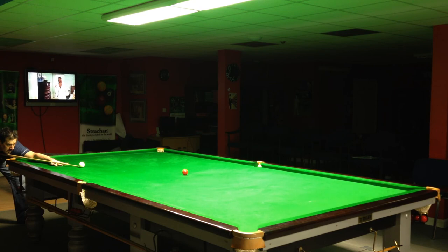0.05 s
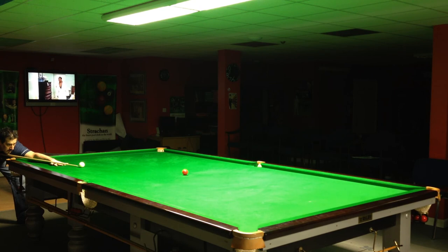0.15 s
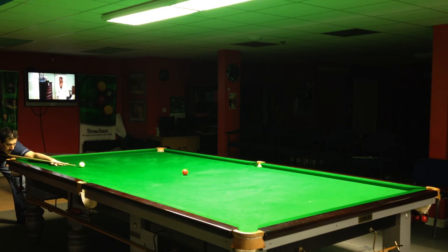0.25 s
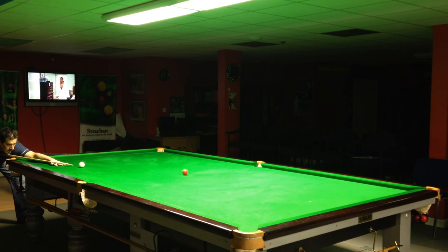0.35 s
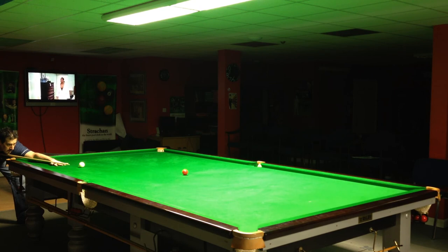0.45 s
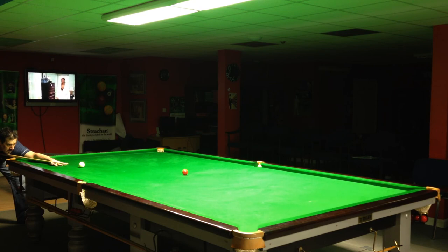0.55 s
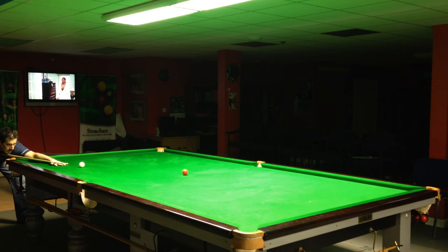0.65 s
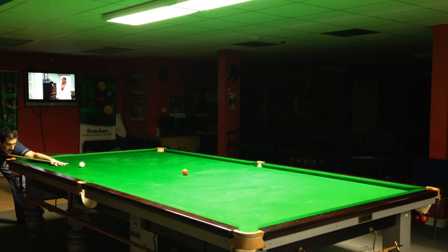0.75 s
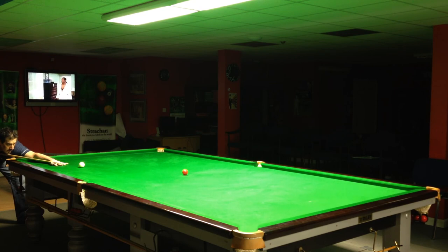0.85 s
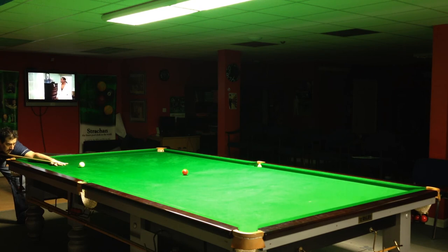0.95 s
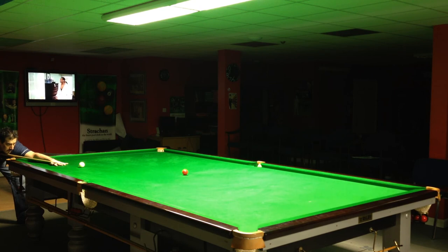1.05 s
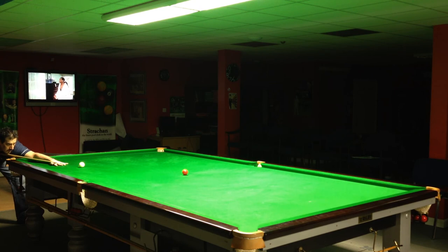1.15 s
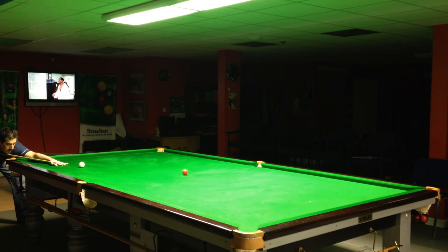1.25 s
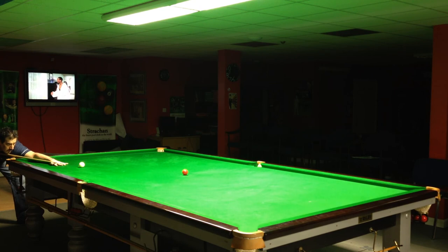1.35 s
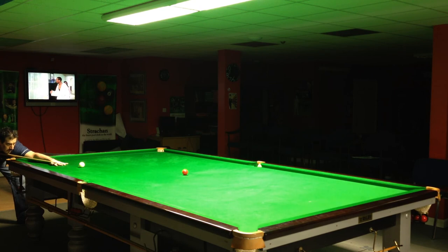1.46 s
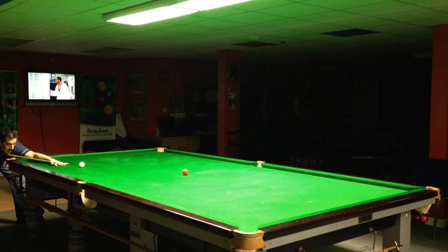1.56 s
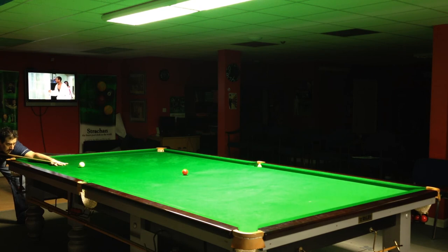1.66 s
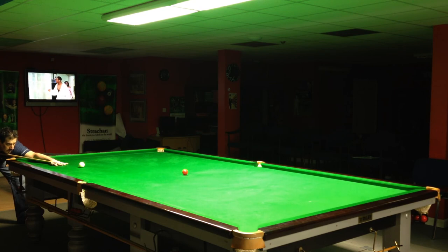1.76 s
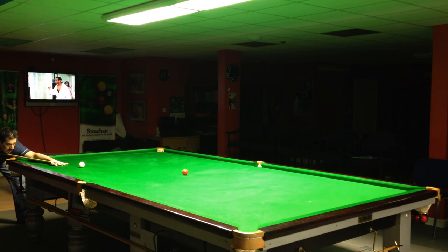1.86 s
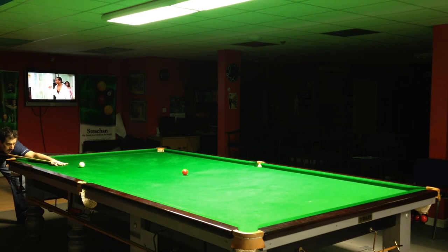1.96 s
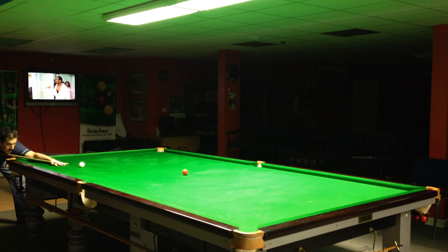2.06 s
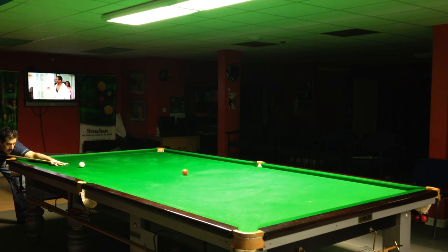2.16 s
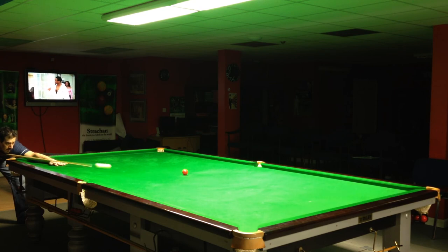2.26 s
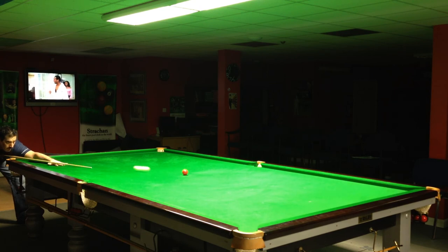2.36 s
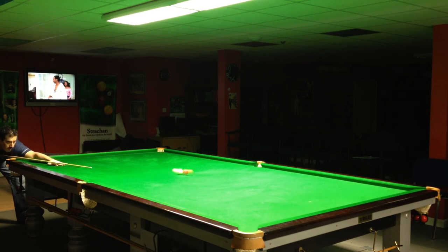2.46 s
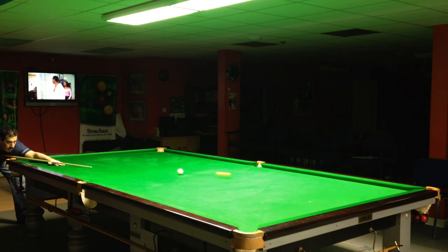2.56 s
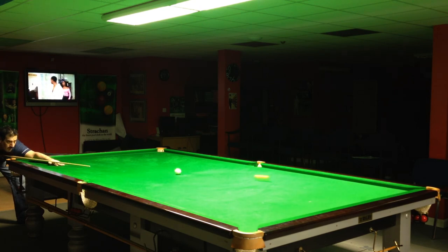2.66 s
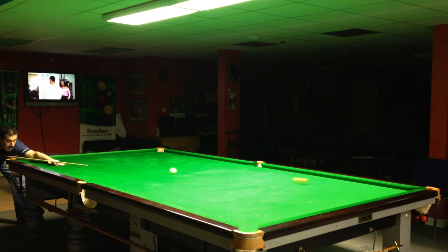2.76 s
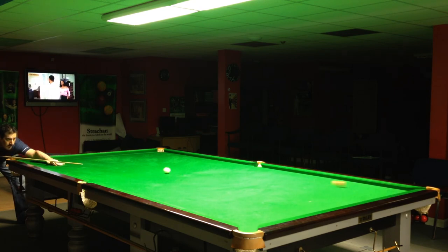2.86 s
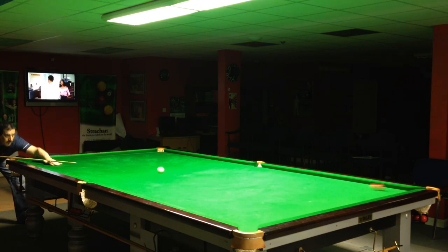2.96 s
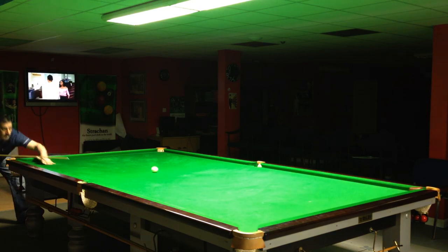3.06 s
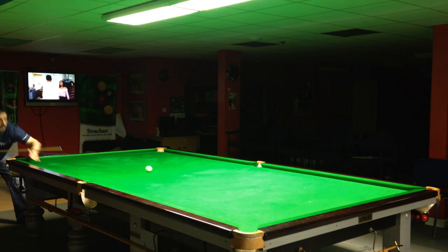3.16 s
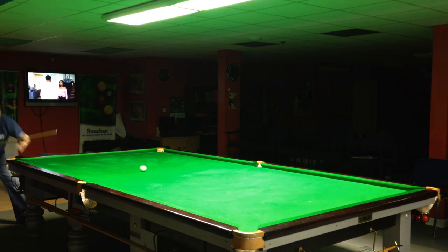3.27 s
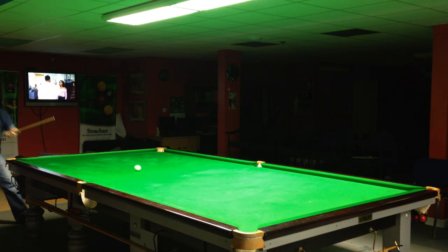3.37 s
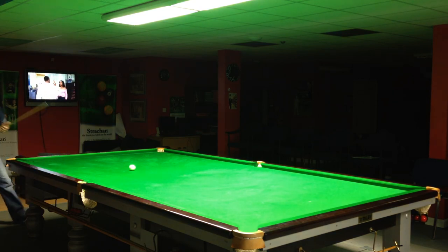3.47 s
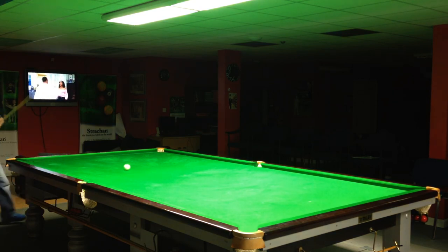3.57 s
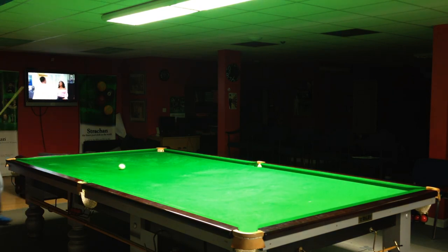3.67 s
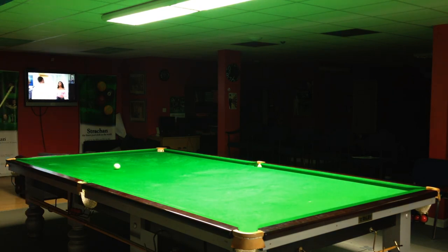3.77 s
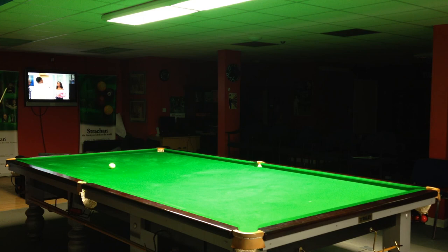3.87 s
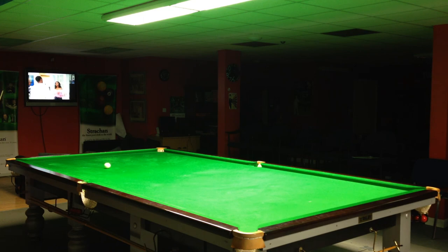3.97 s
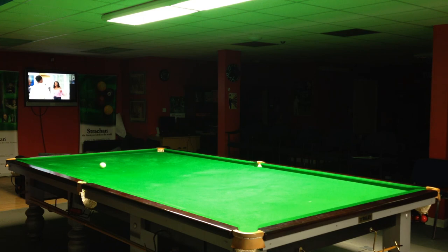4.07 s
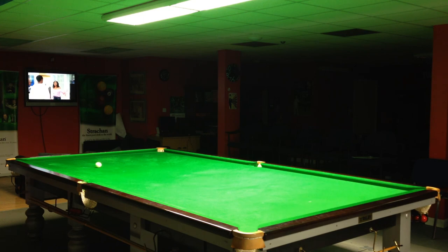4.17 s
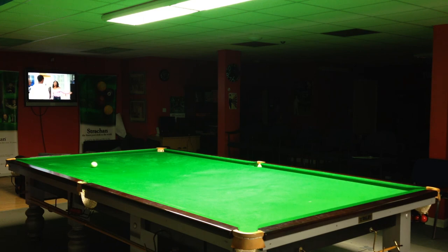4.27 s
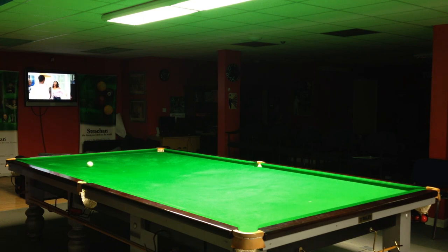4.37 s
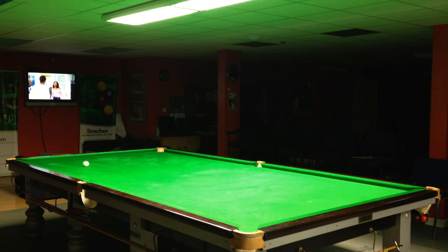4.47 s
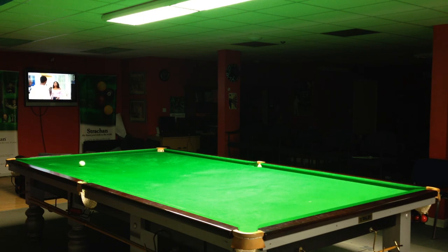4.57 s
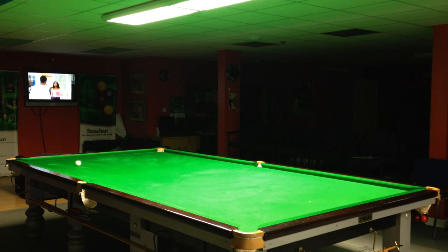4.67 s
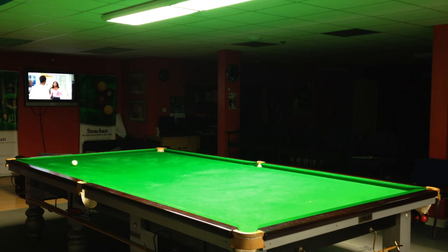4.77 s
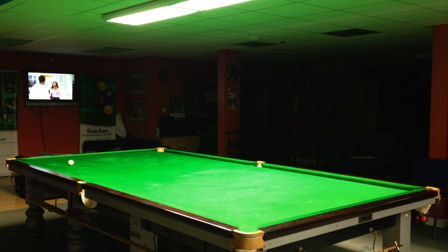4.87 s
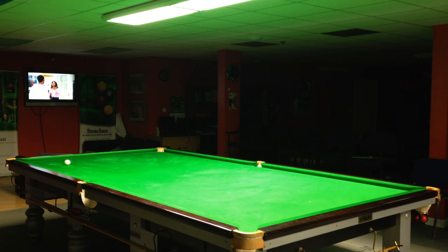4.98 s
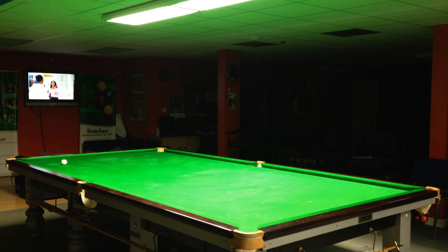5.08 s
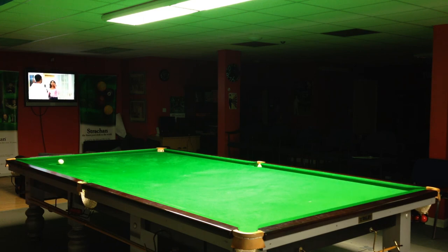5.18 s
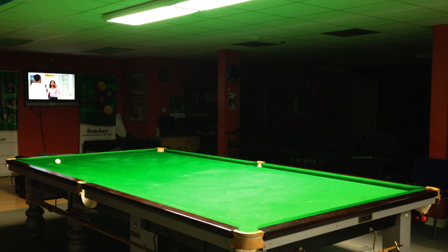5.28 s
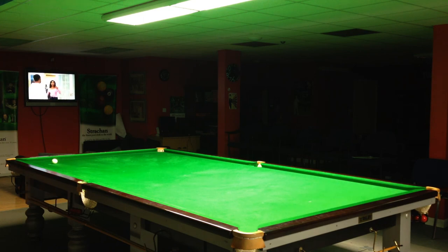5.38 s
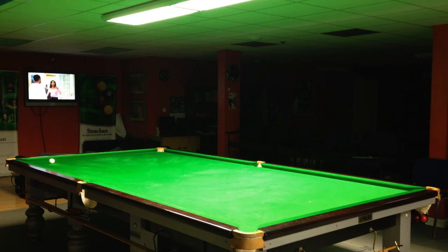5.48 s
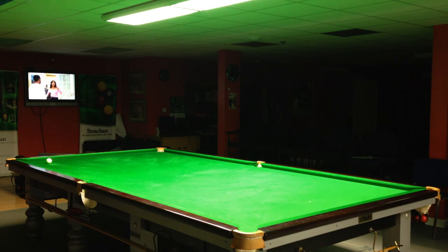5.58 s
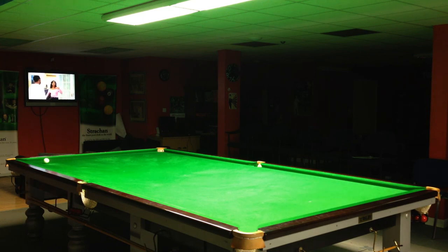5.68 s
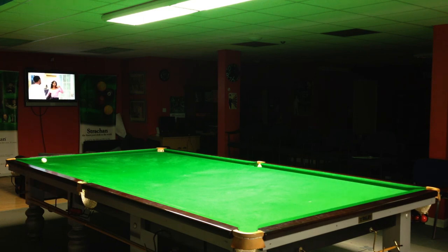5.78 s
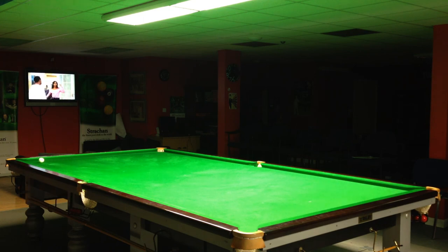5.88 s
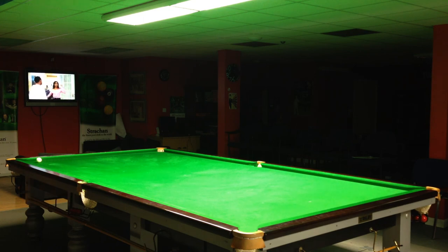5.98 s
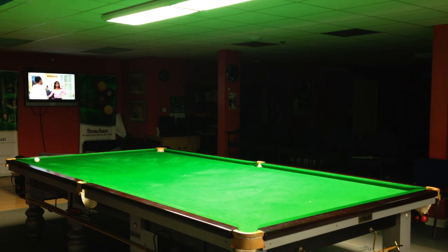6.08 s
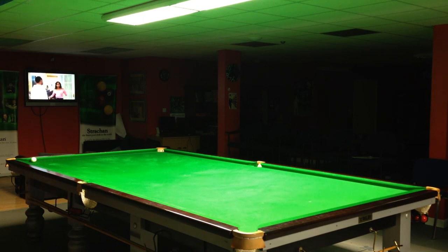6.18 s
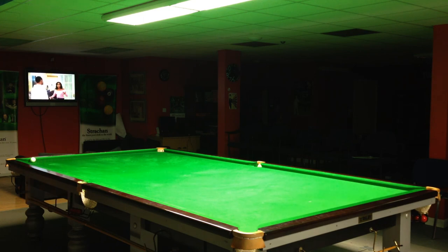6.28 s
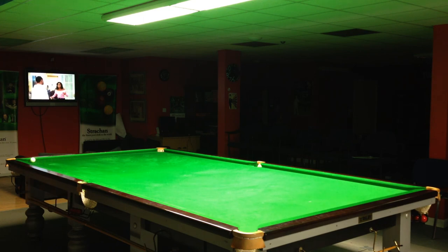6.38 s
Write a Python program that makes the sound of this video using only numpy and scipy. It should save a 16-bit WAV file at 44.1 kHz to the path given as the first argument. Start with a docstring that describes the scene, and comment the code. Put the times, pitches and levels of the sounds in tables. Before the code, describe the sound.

In a quiet, humming room a cue cracks on a snooker ball, balls click sharply, then one thuds into a pocket before soft footsteps.

```python
"""A quiet, low-ceilinged club room, where one snooker shot is played over steady hum, rumble and hiss.
The cue cracks on the white: its shaft rings and its chalked tip rasps. The balls rumble as shaped noise.
The white clicks on a colour, a short pulse with echoes from table and walls. The colour thuds into a pocket,
made of hollow swings and frame rings, and clicks against a ball in the rail below.
The player then steps away with dull noise swells and a faint rustle."""
import sys
import numpy as np
from scipy import signal
from scipy.fft import rfft, irfft
from scipy.io import wavfile

SR = 44100
rng = np.random.default_rng(int(sys.argv[2]) if len(sys.argv) > 2 else 0)


def store_wav(level_fs):
    """Save 16-bit WAV to argv[1]."""
    pcm = np.round(np.clip(np.atleast_2d(level_fs), -1, 1) * 32767)
    wavfile.write(sys.argv[1], SR, pcm.T.astype(np.int16))


N = 284224  # length of the scene [samples]


def amp(db):
    """Turns decibels into a plain gain."""
    return 10 ** (np.asarray(db) / 20)


def unit(x):
    """Scales to an rms of one."""
    return x / np.sqrt(np.mean(x ** 2) + 1e-20)


def read(points, hz):
    """Joins (Hz, value) points by straight lines on a log-frequency axis."""
    f, value = np.transpose(points)
    return np.interp(np.log(hz + 1), np.log(f + 1), value)


def add(mix, s, sound):
    """Mixes a sound in at time s; what runs past the end is cut off."""
    part = mix[round(s * SR):][:len(sound)]
    part += sound[:len(part)]


def noise(spectrum):
    """Steady noise with this spectrum and an rms of one."""
    white = rfft(rng.standard_normal(N))
    gain = amp(read(spectrum, np.fft.rfftfreq(N, 1 / SR)))
    return unit(irfft(white * gain, N))


# ventilation rumble and hiss: (frequency [Hz], relative level [dB])
AIR_SPECTRUM = [(12, -48), (25, -25.5), (36, -14), (50, -5), (100, -2), (160, -5.5), (270, -11.5),
                (500, -17.5), (900, -23.5), (1600, -27.5), (3600, -22.5), (6000, -24.5), (10000, -26),
                (15000, -26)]
# mains and fan tones: (frequency [Hz], rms level [dB])
HUM_TONES = [(48.4, -77), (102, -78), (242.3, -72.5), (398.5, -84.5)]
AIR_DB = -64.5


def background(waver=0.27):
    """Moving air makes a broad noise; mains and fan add tones whose phase wavers (waver in radians rms)."""
    t = np.arange(N) / SR
    out = amp(AIR_DB) * noise(AIR_SPECTRUM)
    for hz, db in HUM_TONES:
        drift = noise([(0, 0), (2, 0), (8, -20), (40, -120)])  # mostly slower than a few Hz
        out += amp(db) * np.sqrt(2) * np.sin(2 * np.pi * hz * t + waver * drift)
    return out


def soften(x, hz):
    """Low-pass of a contact that lasts about one cycle of hz."""
    low_pass = signal.butter(2, min(hz, SR / 3), fs=SR, output="sos")
    return signal.sosfilt(low_pass, x)


def ring(modes, contact_hz):
    """Modes of a struck body die away; a soft, long contact leaves out the treble."""
    t = np.arange(SR // 2) / SR
    body = np.zeros(len(t))
    for k, (hz, db, t60) in enumerate(modes):
        damping = np.log(1000) / t60
        swing = np.exp(-damping * t) * np.cos(2 * np.pi * hz * t)
        # neighbouring modes swing in opposite directions at the far end of the body
        body += (-1) ** k * amp(db) * 2 * damping / SR * swing
    return soften(body, contact_hz)


TAPS = 8192  # frequency grid of a pulse


def pulse(spectrum, pitch=1):
    """The shortest causal click with this spectrum, transposed by pitch."""
    hz = abs(np.fft.fftfreq(TAPS, 1 / SR))
    log_gain = np.log(amp(read(spectrum, hz / pitch)))
    # the Hilbert transform gives the phase that brings the energy in earliest
    minimum_phase = np.exp(np.conj(signal.hilbert(log_gain)))
    return np.fft.ifft(minimum_phase).real[:TAPS // 2]


def scatter(t60, size=SR):
    """A dying spray of reflections of uneven strength, with energy one."""
    taps = np.zeros(size)
    at = np.arange(0, size - 20, 20)  # one reflection somewhere in every 20 samples
    strength = amp(3.5 * np.minimum(rng.exponential(1, len(at)), 3))
    taps[at + rng.integers(0, 20, len(at))] = rng.choice([-1., 1.], len(at)) * strength
    taps *= amp(-60 * np.arange(size) / SR / t60)
    return taps / np.linalg.norm(taps)


# how long the room rings: (frequency [Hz], time to fall by 60 dB [s])
ROOM_DECAY = [(100, 0.79), (300, .55), (700, 0.25), (1300, 0.3), (2300, 0.41), (4000, .38), (8000, 0.12),
              (15000, 0.2793)]


def room(x, build_s=0.014):
    """The diffuse tail: reflections build up, then each band dies at its own speed."""
    hz, t, bands = signal.stft(scatter(np.inf), SR, nperseg=256)
    fade = amp(-60 * t / read(ROOM_DECAY, hz)[:, None])
    tail = signal.istft(bands * fade, SR, nperseg=256)[1][:SR]
    tail *= 1 - np.exp(-(np.arange(SR) / SR / build_s) ** 2)
    return signal.fftconvolve(x, tail / np.linalg.norm(tail))


# tip on ball and then shaft on table:
# (time [s], level [dB], contact cut-off [Hz], room level [dB])
CUE_HITS = [(2.3353, 6.5, 1096, -15.5), (2.3399, 6.5, 3494, -8.5), (2.4824, -9, 1500, -10)]
# ring of the wooden cue: (frequency [Hz], level [dB], time to fall by 60 dB [s])
CUE_RING = [(170, -2, .05), (275, 0, .1), (550, 2, .04), (660, 6, .03), (841, 2, .06), (1012, 0, .05),
            (1250, 2, .03), (1475, 4, .045), (1694, 3, .1), (2304, -3, .07), (2930, -6, .09),
            (4113, 2, .05), (4420, 0, .07)]
# dead knock of the cue: (frequency [Hz], level [dB])
CUE_DEAD_KNOCK = [(60, -30.5), (160, -9.5), (400, -2.5), (700, 1), (1500, 7.5), (2200, -24.5), (5000, -22),
                  (12000, -35.5)]
# the chalked tip gripping the ball: (frequency [Hz], level [dB])
CHALK_RASP = [(800, -22), (1800, -1.5), (2800, -2.5), (3400, -6), (4300, -4.5), (5500, -6.5), (6800, -10.5),
              (7700, -16.5), (8800, -15.5), (10500, -24), (15000, -37)]
CUE_RING_DB, CUE_KNOCK_DB, CUE_NEAR_DB = 3.5, -2, -7  # shaft ring, dead knock, scatter off the table
CHALK_S, CHALK_DB, CHALK_ROOM_DB = 2.3376, 5.5, 4  # the tip leaves the ball


def cue():
    """The shaft rings under each blow, and the chalked tip rasps as it leaves the ball."""
    out = np.zeros(N)
    for s, db, contact_hz, room_db in CUE_HITS:
        blow = amp(db + CUE_RING_DB) * ring(CUE_RING, contact_hz)
        knock = soften(pulse(CUE_DEAD_KNOCK), contact_hz)
        add(blow, 0, amp(db + CUE_KNOCK_DB) * knock)
        add(out, s, blow)
        add(out, s, amp(room_db) * room(blow))
        near = scatter(t60=.08)
        add(out, s, amp(CUE_NEAR_DB) * signal.fftconvolve(blow, near))
    grip = pulse(CHALK_RASP)
    rasp = signal.fftconvolve(grip, scatter(t60=.1))
    add(out, CHALK_S, amp(CHALK_DB) * rasp)
    # the player's body and the cloth shade the top of the rasp from the room
    shaded = soften(grip, hz=4270)
    add(out, CHALK_S, amp(CHALK_ROOM_DB) * room(shaded, build_s=0.017))
    return out


# rumble of a rolling ball: (frequency [Hz], relative level [dB])
ROLL_SPECTRUM = [(35, -18), (80, -5.5), (160, 8), (330, 2.5), (450, -12.5), (650, -20.5), (1500, -36.5),
                 (4000, -67.5)]
# the white to the colour, the colour to the pocket, the colour down the rail:
# (start time [s], length [s], starting level [dB], fading [dB per s])
ROLL_RUNS = [(2.34, 0.35, -68, 21), (2.59, 0.39, -50.5, 33), (3.247, 0.13, -49, 12)]
ROLL_ATTACK_S, ROLL_RELEASE_DB_PER_S = 0.0391, 95  # the table takes up the rumble, and rings on at the stop


def rolling():
    """A running ball rumbles on slate or rail, most while it still skids, and ever less as it settles."""
    rumble, out = noise(ROLL_SPECTRUM), np.zeros(N)
    for start, length, db, fade_db_per_s in ROLL_RUNS:
        age = np.maximum(np.arange(N) / SR - start, 0)
        fall_db = fade_db_per_s * np.minimum(age, length)
        fall_db += ROLL_RELEASE_DB_PER_S * np.maximum(age - length, 0)
        attack = np.minimum(age / ROLL_ATTACK_S, 1)
        out += attack * amp(db - fall_db) * rumble
    return out


# ball on ball, or on the wire of the rail: (time [s], level [dB], pitch factor from the hardness
# of the hit, wall echo level [dB], near scatter level [dB], room level [dB])
BALL_CLICKS = [(2.588, 22.5, 0.92, -1, -15.5, -6.5), (3.379, -32, 0.67, -10, 5, 9),
               (3.4426, 4, .7, -20, -10, -18), (3.4439, 11, .75, -7, -8, -13),
               (3.447, 5, 0.91, -2.5, 2.5, -27)]
# the click straight from the balls: (frequency [Hz], level [dB])
DIRECT_SPECTRUM = [(100, -49), (600, -31.5), (1100, -29), (1800, -25), (2500, -13), (3100, 0.5), (4000, -6),
                   (4800, -16), (6000, -49), (9000, -60), (11500, -40), (15000, -47.5)]
# the duller click that they throw sideways into the room: (frequency [Hz], level [dB])
SPREAD_SPECTRUM = [(100, -29.5), (400, -25), (700, -24), (900, -13), (1300, -8.5), (1650, -8), (2150, -1),
                   (2650, -4.5), (3200, -8), (4100, -13), (4900, -22), (5900, -34.5), (14000, -42.5)]
# echoes from slate, cushions, ceiling and walls: (delay time [s], level [dB], pitch factor)
CLICK_ECHOES = [(.0016, -10, 0.923), (.0038, -5, 0.8482), (.0135, -18, 0.75), (.0208, -21, 0.7),
                (0.0277, -9, .88), (.0325, -17, 0.33), (.0362, -13.5, .85), (.0485, -27, 1),
                (.0635, -16, 0.633)]


def clicks():
    """Hard balls touch for a fraction of a millisecond; all that follows is table and room."""
    out = np.zeros(N)
    for s, db, pitch, echo_db, near_db, room_db in BALL_CLICKS:
        add(out, s, amp(db) * pulse(DIRECT_SPECTRUM, pitch))
        for delay, loss_db, dulling in CLICK_ECHOES:
            echo = soften(pulse(DIRECT_SPECTRUM, pitch * dulling), hz=5500)
            add(out, s + delay, amp(db + echo_db + loss_db) * echo)
        spread = amp(db) * pulse(SPREAD_SPECTRUM, pitch ** .3)
        near = signal.fftconvolve(spread, scatter(t60=0.12))
        add(out, s, amp(near_db) * near)
        add(out, s, amp(room_db) * room(spread, build_s=0.013))
    return out


def bump(hz):
    """A padded blow: a hollow swing that swells and dies within a few cycles; gain about one at hz."""
    turns = np.arange(SR // 2) / SR * hz
    swell = turns ** 2 * np.exp(-turns / .6)
    return 2 * swell / swell.sum() * np.sin(2 * np.pi * turns)


# a ball hops on the slate, then knocks on the jaws and tumbles into the pocket:
# (time [s], level [dB], pitch of the padding [Hz], slap level [dB], frame ring level [dB], room level [dB])
POCKET_THUDS = [(2.6170, 1, 115.1, -15.5, -16.5, -8), (2.7330, 6.5, 181, -32, -6.5, -17),
                (3.1918, 15.5, 500, -18.5, -6, -5.5), (3.207, 17, 276, -40.5, -5, -4.5),
                (3.214, 17, 78, -67, -12, -8.5), (3.2286, 15.5, 470, -27.5, -8, -29),
                (3.239, 20.5, 343, -44, -0.5, -12), (3.259, 12, 313, -33, -2, -13),
                (3.2830, 13.5, 345, -44, -14, -21), (3.466, 6, 135.5, -24.5, -20.5, -4)]
# slap on rubber or leather: (frequency [Hz], level [dB])
SLAP_SPECTRUM = [(100, -24.5), (500, 3.5), (750, -2.5), (1150, -0.5), (1450, -16), (2000, -26),
                 (4000, -38.5), (9000, -63.5)]
# ring of the pocket and table frame: (frequency [Hz], level [dB], time to fall by 60 dB [s])
FRAME_RING = [(130, -5, .1), (194, -3, .12), (316, 5, .24), (382, 7, .24), (474, -5, .14), (524, -4, .14),
              (760, -20, .06)]


def pocket():
    """Cloth, rubber and leather bump and slap, and pass the blow on to the low modes of the frame."""
    out = np.zeros(N)
    for s, db, hz, slap_db, frame_db, room_db in POCKET_THUDS:
        thud = bump(hz)
        add(thud, .004, amp(-12.0) * bump(hz))  # the floor below the pocket throws it straight back
        slap = signal.fftconvolve(pulse(SLAP_SPECTRUM), scatter(t60=0.054))
        add(thud, .002, amp(slap_db) * slap)
        add(thud, .002, amp(frame_db) * ring(FRAME_RING, 1.9 * hz))
        add(out, s, amp(db) * thud)
        add(out, s, amp(db + room_db) * room(thud, build_s=0.014))
    return out


# the player's clothes and shoes as he moves off: (start time [s], length [s])
SHUFFLE_SPAN = (3.88, 2.26)
# colour of the rustle: (frequency [Hz], relative level [dB])
SHUFFLE_SPECTRUM = [(100, -20), (350, 1.5), (650, -4.5), (1200, -13), (2000, -13), (6000, -40)]
SHUFFLE_DB, SHUFFLE_PATCHY_DB, SHUFFLE_RATE_HZ = -77, 1.5, 14  # level, unevenness (rms), its fastest full rate


def shuffle():
    """Clothes and shoes make a faint, uneven rustle that swells and fades as the player walks."""
    start, length = SHUFFLE_SPAN
    along = np.clip((np.arange(N) / SR - start) / length, 0, 1)
    swell = np.sqrt(abs(np.sin(np.pi * along)))
    patches = noise([(0, 0), (SHUFFLE_RATE_HZ, 0), (10 * SHUFFLE_RATE_HZ, -60)])
    return swell * amp(SHUFFLE_DB + SHUFFLE_PATCHY_DB * patches) * noise(SHUFFLE_SPECTRUM)


# footfalls and scuffs of the player: (time [s], level [dB], rise to the peak [s], centre frequency [Hz])
FOOTFALLS = [(4.02, -65.5, 0.01536, 746), (4.087, -58, 0.0146, 288), (4.098, -62.5, 0.0293, 140),
             (4.137, -55, 0.03, 91), (4.329, -65, 0.016, 680), (4.786, -61, 0.00987, 161),
             (4.888, -73, 0.032, 805), (5.323, -70.5, 0.024, 506), (5.413, -73, .028, 696)]


def steps():
    """Soft shoes on carpet: each contact is a swell of dull noise."""
    out = np.zeros(N)
    for s, db, rise_s, hz in FOOTFALLS:
        age = np.maximum(np.arange(N) / SR - s, 0) / rise_s
        swell = age * np.exp(1 - age)
        colour = [(hz / 5, -22), (hz, 0), (hz * 1.135, -1), (hz * 2.1, -17), (hz * 12, -55)]
        out += amp(db) * swell * noise(colour)
    return out


def scene():
    """The room, the shot and the player, at one microphone."""
    shot = cue() + rolling() + clicks() + pocket()
    player = shuffle() + steps()
    return (background() + shot + player)[None]


EDGE_HZ = 15400  # top of the treble


def record(dry):
    """The recorder's band limit: a steep low-pass takes away the highest treble."""
    low_pass = signal.firwin(511, EDGE_HZ, window=("kaiser", 9), fs=SR)
    return signal.oaconvolve(dry, low_pass[None], "same")


dry = scene()
out = record(dry)
store_wav(out)
```